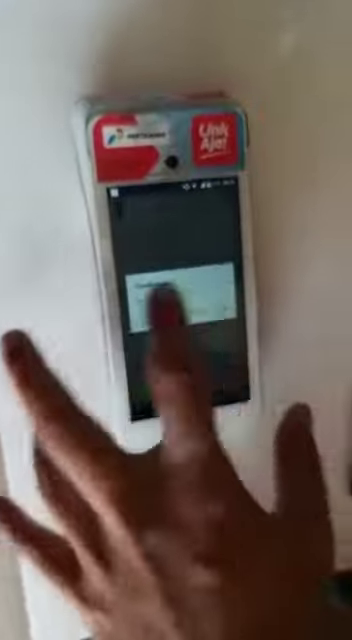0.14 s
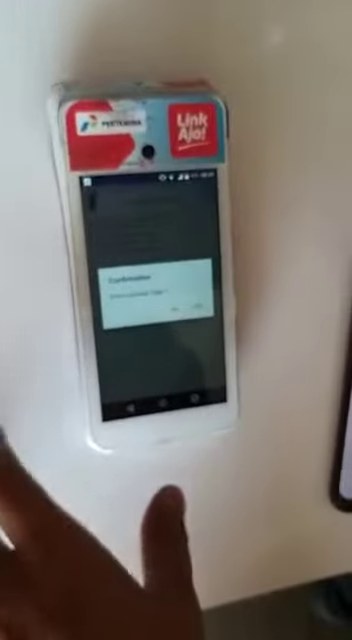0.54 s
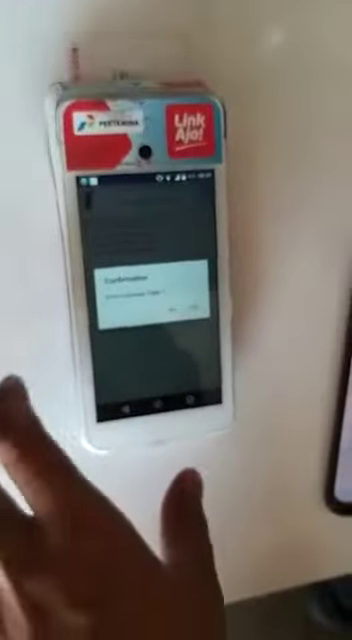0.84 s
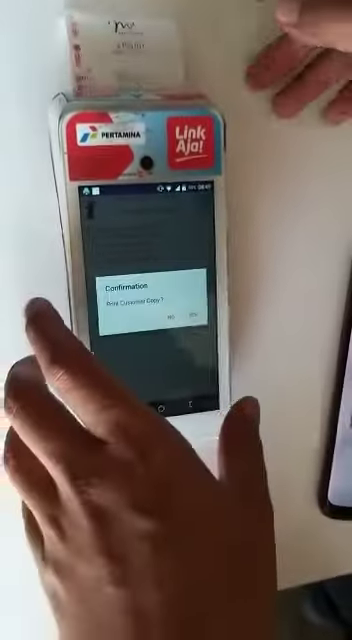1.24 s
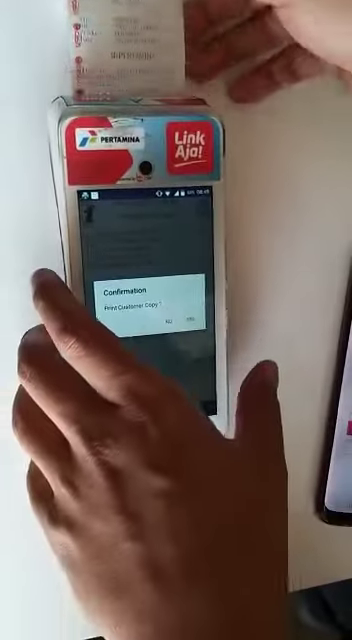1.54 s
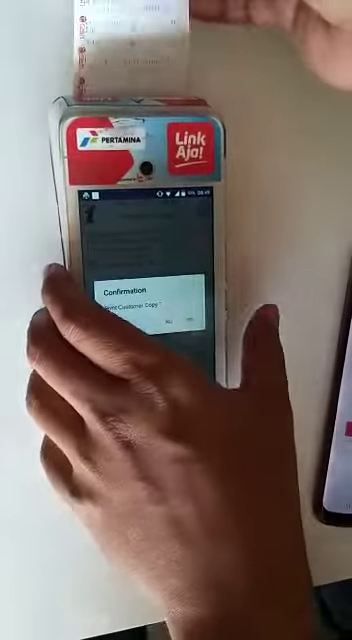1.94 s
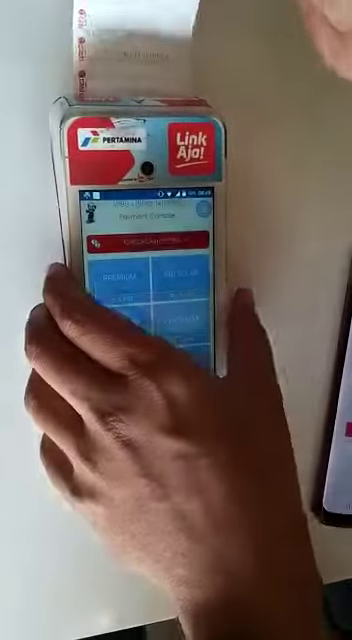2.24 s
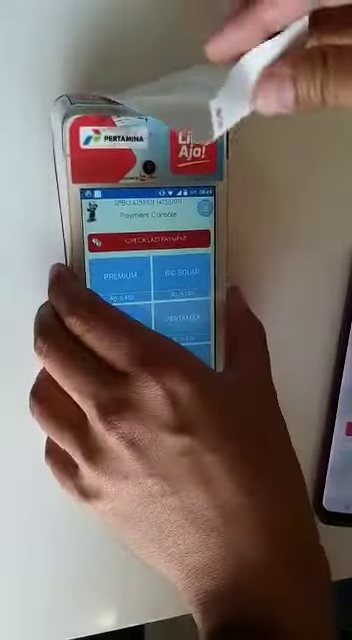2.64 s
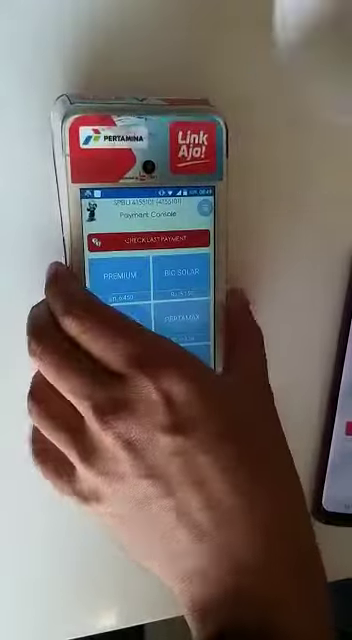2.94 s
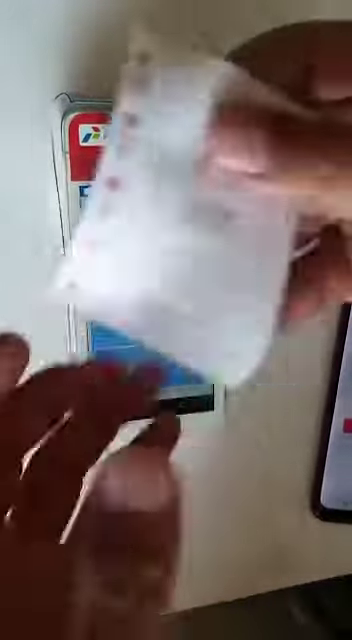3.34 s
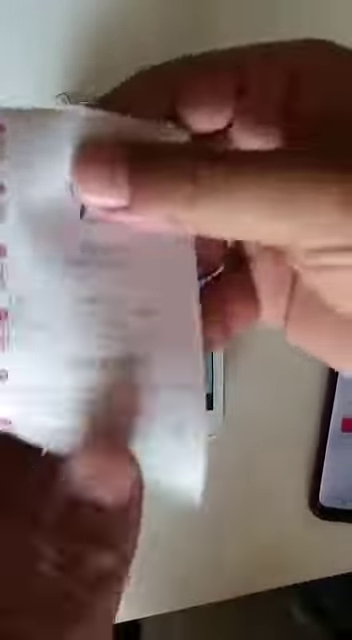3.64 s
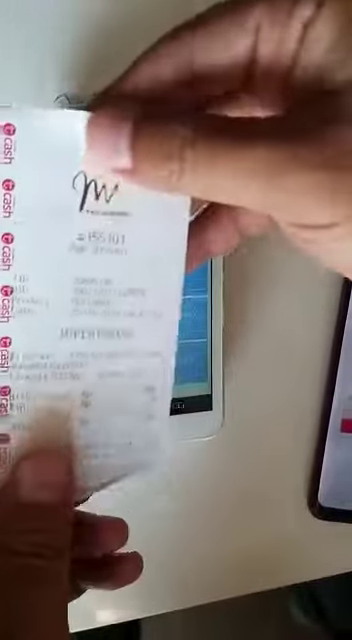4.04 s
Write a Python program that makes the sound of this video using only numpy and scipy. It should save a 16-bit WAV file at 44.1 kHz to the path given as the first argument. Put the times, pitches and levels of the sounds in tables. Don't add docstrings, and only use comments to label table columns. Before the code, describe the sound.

Grinding buzz of a handheld terminal printing, a pause with soft paper rustle, a sharp short tear, light crinkles and a final crisp flick.

```python
import sys
import numpy as np
from scipy import signal
from scipy.fft import rfft, irfft
from scipy.io import wavfile
from scipy.ndimage import map_coordinates

SR = 44100
rng = np.random.default_rng(int(sys.argv[2]) if len(sys.argv) > 2 else 0)


def makeup_ratio(level_db):
    decades = np.asarray(level_db, float) / 20
    return 10 ** decades


def unload_audio(sound):
    columns = np.transpose(np.atleast_2d(sound))
    steps = np.round(np.clip(columns, -1, 1) * 32767)
    wavfile.write(sys.argv[1], SR, steps.astype(np.int16))


N = 183897


def rms_one(x):
    return x / np.sqrt(np.mean(x ** 2) + 1e-20)


def in_time(rows):
    t = np.arange(N) / SR
    s, *columns = np.transpose(rows)
    gate = np.clip(np.minimum(t - s[0], s[-1] - t) / 0.0024, 0, 1)
    return [np.interp(t, s, c) for c in columns] + [gate]


def drift(rate):
    knots = rng.standard_normal(4000)
    return rms_one(map_coordinates(knots, [np.arange(N) * rate / SR], order=3))


def colour(x, spectrum):
    hz, db = np.transpose(spectrum)
    log_hz = np.log(np.linspace(1, SR / 2, 2049))
    cepstrum = irfft(np.log(makeup_ratio(np.interp(log_hz, np.log(hz), db))))
    cepstrum[1:2048] *= 2
    cepstrum[2049:] = 0
    impulse = irfft(np.exp(rfft(cepstrum)))
    return signal.oaconvolve(np.atleast_2d(x), impulse[None], axes=1)[:, :N]


def resonate(x, modes):
    out = 0
    for k, (hz, width, db) in enumerate(modes):
        r = np.exp(-np.pi * width / SR)
        a = [1, -2 * r * np.cos(2 * np.pi * hz / SR), r * r]
        out = out + (-1) ** k * makeup_ratio(db) * signal.lfilter([1 - r, 0, r - 1], a, x + 1e-18)
    return out


def band(x, low_hz, high_hz):
    return signal.sosfilt(signal.butter(2, [low_hz, high_hz], "band", fs=SR, output="sos"), x)


def grains(per_s, spread_db):
    sizes = makeup_ratio(spread_db * np.minimum(rng.exponential(1, N), 5)) * rng.choice([-1, 1], N)
    return rms_one(sizes * (rng.random(N) < per_s / SR))


def swell(start_s, rise_s, db, fall_db_per_s, rise_db):
    t = np.arange(N) / SR - start_s
    rise_s = max(rise_s, .002)
    below_db = rise_db * np.clip(1 - t / rise_s, 0, 1)
    sunk_db = fall_db_per_s * np.clip(t - rise_s, 0, 2)
    return (t > 0) * makeup_ratio(db - below_db - sunk_db)


def ports(x, lag_s, alike_hz):
    mid = x[0]
    side = signal.lfilter(*signal.butter(1, alike_hz, "high", fs=SR), x[1])
    right = map_coordinates(mid - side, [np.arange(N) - lag_s * SR], order=3)
    return np.array([mid + side, right])


# (frequency [Hz], level [dB])
TRAFFIC = [(18, -63.5), (30, -22), (38, -26.5), (66, -3.5), (103, -6), (170, -4), (374, -10.5), (404, -12),
           (449, -16.5), (702, -18), (988, -25.5), (1130, -28), (2230, -33.5), (2900, -36.5), (16000, -60)]
# (time [s], level [dB])
TRAFFIC_DB = [(0.0, -54), (0.65, -54), (0.91, -50.5), (1.33, -51), (1.56, -49), (2.17, -54), (2.45, -51),
              (2.65, -54.5), (2.79, -48), (2.97, -55), (3.4, -56.5), (4.17, -54)]


def traffic():
    level_db, gate = in_time(TRAFFIC_DB)
    noise = rms_one(colour(rng.standard_normal((2, N)), TRAFFIC))
    drone = rms_one(resonate(rng.standard_normal(N), [(84.6, 2.2, 0)]))
    lows = band(noise[0], 27, 130)
    noise[0] += (lows + 0.39 * drone) * makeup_ratio(1.0 * drift(4.4)) - lows
    wind = makeup_ratio(-73) * rms_one(band(rng.standard_normal((2, N)), 12, 90))
    hiss = makeup_ratio(-84.5) * rms_one(band(rng.standard_normal((2, N)), 11000, 17000))
    rumble = ports(noise, lag_s=0.000066, alike_hz=928)
    return makeup_ratio(level_db + 0.78 * drift(6.05)) * rumble + wind + hiss


# (frequency [Hz], level [dB])
SLIP = [(300, -9.5), (550, -3.5), (780, 1.5), (1080, -4), (1500, -1), (2350, 4.5), (3000, 0), (4500, -1.5),
        (8000, 0.5)]
# (time [s], peak level [dB], ring frequency [Hz], length [s])
TAPS = [(.2, -56, 6000, 0.015), (.605, -36.5, 2270, .017), (2.194, -48.5, 5020, 0.034),
        (2.316, -55, 5500, .015), (2.333, -46, 2100, .035), (2.399, -33.5, 530, 0.039),
        (2.4005, -23, 4460, 0.02), (2.4, -33, 1300, .03), (2.645, -21, 806, 0.05), (3.712, -38, 1010, .03),
        (3.713, -33.5, 1810, .04), (3.845, -37.5, 1400, .014), (4.137, -26, 1900, .03)]
CREASES = [(2.036, -59, 3950, .02), (2.953, -37, 6760, 0.018), (3.014, -41.5, 2920, .018),
           (3.162, -49.5, 3930, 0.045), (3.226, -45, 2500, 0.015), (3.291, -54, 6060, 0.018),
           (3.373, -50, 4700, .02), (3.598, -51, 3980, 0.046), (3.628, -46, 4900, 0.036),
           (3.633, -40, 5000, .02), (3.649, -42, 5000, 0.016), (3.668, -33, 4200, 0.013),
           (3.681, -36, 4530, 0.052), (3.702, -40, 4700, 0.044), (3.71, -31, 4600, 0.059),
           (4.048, -53, 5000, 0.078)]
CATCHES = [(2.556, -26.5, 3160, 0.0081), (2.579, -24.5, 3980, 0.011), (2.5847, -14.5, 6070, .007),
           (2.5909, -16.5, 3400, 0.016), (2.605, -35, 6030, .018), (2.6185, -13, 3340, 0.012),
           (2.623, -15, 2320, 0.03), (2.631, -20.5, 3000, 0.035), (2.642, -13, 3570, .02),
           (2.645, -7, 2300, .013), (2.648, -12.5, 4500, .008), (2.667, -14, 4550, 0.019),
           (2.6985, -12, 2400, 0.078), (2.730, -19, 2400, 0.042), (2.736, -16, 2600, .02),
           (2.683, -20, 4500, .03), (2.75, -18.5, 6500, 0.0066), (2.754, -15, 4510, 0.011)]
LAST_FIBRES = [
    (2.765, -14, 4030, .029),
    (2.7672, -2.5, 4400, .006),
]
FLICKS = [
    (4.1265, -40, 1800, .03),
    (4.13, -44, 5000, .03),
    (4.1428, -10, 6900, .022),
    (4.1436, -16, 4300, .025),
    (4.1445, -23, 1300, .025),
    (4.1435, -28, 450, .03),
]
# (rise [s], ring [dB], treble at 4 kHz ring [dB], treble tilt [dB per octave of ring])
CATCH, CREASE, TAP = (.0012, 4, -5, .1), (.0025, 2.5, -9.5, 3), (.0045, 4, -27, 4)
FLICK, LET_GO = (-0.14, 7.5, -24, -2), (.0026, 7, -11, .1)


def snaps():
    out, t = np.zeros((2, N + 4000)), np.arange(4000) / SR
    cracks = rng.standard_normal((60, 2, 4000)) * makeup_ratio(3.9 * rng.standard_normal((60, 1, 4000)))
    kinds = ((CATCHES, CATCH), (CREASES, CREASE), (TAPS, TAP), (FLICKS, FLICK), (LAST_FIBRES, LET_GO))
    rows = [row + kind for table, kind in kinds for row in table]
    for (s, db, hz, length, rise, ring_db, treble_db, tilt_db), crack in zip(rows, cracks):
        decay = makeup_ratio(-60 * np.maximum(t - rise, 0) / max(length, .003))
        burst = crack * decay * np.minimum(t / max(rise, .0002), 1)
        top_hz = np.clip(2.51 * hz, 420, 7800)
        broad = band(band(burst, max(280, 0.14 * hz), top_hz), 170, top_hz)
        broad = broad + resonate(burst, [(hz, hz * 0.14, ring_db)])
        treble = band(band(burst, 7000, 18000), 6500, 18000)
        treble_gain = makeup_ratio(treble_db + tilt_db * np.log2(hz / 4000))
        sound = broad / np.abs(broad[0]).max() + treble_gain * treble / np.abs(treble[0]).max()
        at = round(s * SR)
        out[:, at:at + 4000] += makeup_ratio(db) * sound * [[1], [.45]]
    return colour(out[:, :N], SLIP)


# (frequency [Hz], level [dB])
CASE = [(300, -16.5), (480, -16.5), (600, -3), (780, 2), (940, 5.5), (1000, -1), (1070, -12), (1250, -1.5),
        (1400, -6), (2000, -34.5)]
GEARS = [(1200, -16), (1700, -5.5), (1840, -3), (1950, -1), (2200, 4.5), (2320, 6.5), (2420, -8),
         (2650, -12), (2760, -10), (2850, -30), (3300, -11.5), (3700, -17), (5000, -28.5)]
FEED = [(3000, 7.5), (3800, -8), (4600, 2), (6400, -5.5), (7400, -4), (8000, -5), (10800, -14.5),
        (13000, -15.5), (16000, -14)]
# (multiple of step rate [1], level [dB])
HUM = [(4, -13), (5, -7), (6, 0), (8, -13)]
# (start [s], slowest [s], end [s], step rate [1/s])
DENSE_LINES = [(.56, .6, .69, 140), (.87, .9, .94, 149), (.955, .985, 1.1, 137), (.97, 1.1, 1.21, 122),
               (1.12, 1.18, 1.22, 137), (1.24, 1.33, 1.42, 127), (1.45, 1.5, 1.56, 144),
               (1.52, 1.56, 1.66, 127), (1.64, 1.68, 1.77, 120)]
# (time [s], frequency [Hz], level [dB])
SLIP_RING = [(.6, 2044, -52), (.66, 2236, -49), (.72, 2250, -62), (.95, 2153, -55.5), (1.2, 2260, -53.5),
             (1.4, 2400, -52), (1.62, 2480, -52), (1.8, 2780, -57), (1.985, 3150, -55)]
# (time [s], level [dB])
EFFORT = [(.6, -52), (.67, -54), (.692, -44), (.88, -49.5), (1.13, -46.5), (1.19, -42), (1.27, -48.5),
          (1.74, -45.5), (1.985, -45)]
PRINT_S = (.6, 1.985)
FREE_PER_S, FULL_LOAD_PER_S = 156, 30
UNEVEN_FREE, UNEVEN_LOADED = .4, .55
HUM_DB, WHINE_DB, HISS_DB = -6.5, -50.5, -54.5
HUM_LOAD_DB, WHINE_LOAD_DB, HISS_LOAD_DB = 7, 3, -3


def printer():
    t = np.arange(N) / SR
    gate = np.clip(np.minimum(t - PRINT_S[0], PRINT_S[1] - t) / .0026, 0, 1)
    slowed = np.max([(FREE_PER_S - per_s) * np.interp(t, times, [0, 1, 0])
                     for *times, per_s in DENSE_LINES], axis=0)
    per_s, load = FREE_PER_S - slowed, slowed / FULL_LOAD_PER_S
    uneven = UNEVEN_FREE + (UNEVEN_LOADED - UNEVEN_FREE) * load
    slip_hz, slip_db, _ = in_time(SLIP_RING)
    case_db, _ = in_time(EFFORT)

    turns = np.cumsum(per_s * (1 + .04 * uneven * drift(30)) / SR)
    hum = sum(makeup_ratio(db + 4.5 * drift(40)) * np.sin(2 * np.pi * k * turns) for k, db in HUM)
    ticks = np.diff(np.floor(turns + .08 * uneven * drift(120)), prepend=0)
    steps = rms_one(ticks * makeup_ratio(2.5 * drift(150)))
    knocks = steps * (1 - uneven) + grains(3000, spread_db=1.5) * uneven
    case = rms_one(colour(knocks, CASE)[0]) + makeup_ratio(HUM_DB + HUM_LOAD_DB * load) * hum

    teeth = np.array([grains(4000, spread_db=3) for side in range(2)])
    smooth_teeth = signal.lfilter([1], [1, -2 * .975, .975 ** 2], teeth[0])
    slip = rms_one(smooth_teeth * np.cos(2 * np.pi * np.cumsum(slip_hz) / SR))
    whine = rms_one(colour(teeth + 0.24 * steps, GEARS)) * [[.7], [.3]]
    shaft = rms_one(resonate(teeth[0], [(2320, 50, 0)]))
    whine[0] += makeup_ratio(-1.5 + 2.5 * drift(18)) * shaft

    feed = [grains(9000, spread_db=1.5) for side in range(2)]
    hiss = rms_one(colour(feed, [(1500, -26)] + FEED)) * [[.85], [.5]]
    hiss[0] += makeup_ratio(-12 + 5 * drift(9)) * rms_one(resonate(teeth[1], [(4750, 300, 0)]))
    hiss[0] += makeup_ratio(-15 + 5 * drift(8)) * rms_one(resonate(teeth[1], [(5450, 300, 0)]))
    hiss = hiss * makeup_ratio(HISS_DB + HISS_LOAD_DB * load + drift(30))

    body = makeup_ratio(case_db + 1.2 * drift(45)) * case
    body += makeup_ratio(slip_db + 2.2 * drift(20)) * slip
    return gate * (body * [[1], [0]] + makeup_ratio(WHINE_DB + WHINE_LOAD_DB * load) * whine + hiss)


# (start [s], end [s], peak level [dB], relative top [dB])
STROKES = [(1.986, 2.04, -61, -1), (2.05, 2.137, -65, -5.5), (2.167, 2.225, -68.5, -7),
           (2.353, 2.4, -76, -18), (2.41, 2.482, -64, -4), (2.478, 2.575, -64, -8), (2.9, 2.97, -59, -7),
           (2.967, 3.056, -61, -5.5), (3.06, 3.12, -65.5, -5), (3.15, 3.21, -68, -7),
           (3.212, 3.302, -63, -1), (3.316, 3.38, -69, -5), (3.37, 3.455, -69.5, -3),
           (3.512, 3.563, -75, -12), (3.597, 3.615, -67, -5), (3.663, 3.74, -63, -1),
           (3.727, 3.815, -62, -2), (3.883, 3.99, -65, -7), (4.004, 4.089, -72.5, -9),
           (4.12, 4.17, -74, -4)]
STROKE_RISE_S, STROKE_RISE_DB, STROKE_SAG_DB_PER_S, LIFT_DB_PER_S = 0.025, 10, 30.5, 300


def rustle():
    t = np.arange(N) / SR
    grit = np.array([grains(9000 * makeup_ratio(2.5 * drift(40)), spread_db=2.5) for side in range(2)])
    body = rms_one(band(grit, 1800, 7500) + .45 * resonate(grit, [(5000, 700, 8)]))
    top = rms_one(band(band(grit, 8000, 17000), 7500, 17000))
    gains = []
    for start_s, end_s, db, top_db in STROKES:
        lift = makeup_ratio(-LIFT_DB_PER_S * np.clip(t - end_s, 0, 1))
        gains.append(lift * swell(start_s, STROKE_RISE_S, db, STROKE_SAG_DB_PER_S, STROKE_RISE_DB))
    gains = np.array(gains)
    tops = gains * makeup_ratio(np.array(STROKES)[:, 3:])
    return np.max(gains, axis=0) * body + np.max(tops, axis=0) * top


# (frequency [Hz], level [dB])
TORN = [(300, -12.5), (550, -7), (790, -2), (1080, -16.5), (1500, -8), (2400, -1.5), (3500, -8.5),
        (5000, -3), (6700, -5.5), (8500, -12.5), (10500, -16), (12500, -8), (16000, -14.5)]
# (time [s], level [dB])
PULL = [(2.575, -50), (2.62, -42), (2.64, -39.5), (2.652, -23.5), (2.72, -25), (2.745, -25), (2.762, -43),
        (2.785, -40), (2.86, -59)]


def rip():
    fibres_db, gate = in_time(PULL)
    clumps = makeup_ratio(6 * drift(140))
    breaks = [grains(3000 * clumps, spread_db=4.5) for side in range(2)]
    fibres = rms_one(colour(breaks, TORN))
    bright = band(fibres, 7000, 17000)
    fibres = fibres + bright * (makeup_ratio(6.2 * drift(90) - 3.5) - 1)
    return gate * makeup_ratio(fibres_db) * fibres * [[1], [.6]]


# (start [s], rise [s], peak level [dB], fall [dB/s])
THUMPS = [
    (2.59, 0.077, -41, 61.5),
    (2.70, 0.093, -43, 199.5),
    (4.139, 0.0073, -47, 400),
]


def thumps():
    thump = rms_one(band(rng.standard_normal(N), 75, 195))
    return thump * sum(swell(*row, rise_db=11) for row in THUMPS)


def echoes(x, t60, start_s):
    t = np.arange(SR // 2) / SR
    mid, side = rng.standard_normal((2, len(t))) * makeup_ratio(-60 * t / t60) * (t > start_s)
    side = signal.lfilter(*signal.butter(2, 900, "high", fs=SR), side)
    roof = [(300, 6.5), (800, 3.5), (1600, 2.5), (2400, -2.5), (3500, 1.5), (7000, -3.5), (16000, -3.5)]
    tails = colour([mid + side, mid - side], roof)
    return signal.fftconvolve(x, tails / np.sqrt(np.sum(tails ** 2) / 2), axes=1)[:, :N]


def scene():
    near = ports(snaps(), lag_s=0.000207, alike_hz=1180)
    near = near + ports(printer(), lag_s=0.00031, alike_hz=600)
    near = near + ports(rustle(), lag_s=.0001, alike_hz=900)
    near = near + ports(rip(), lag_s=0.00028, alike_hz=1400)
    canopy = makeup_ratio(-12.5) * echoes(near, t60=0.44, start_s=0.0044)
    return near + canopy + thumps() + traffic()


def top_cut(x):
    return signal.sosfilt(signal.butter(12, 16960, fs=SR, output="sos"), x)


def record(dry):
    right = colour(dry[1], [(700, 0.5), (1500, 1.5), (3000, -1), (12000, -2.5)])[0]
    both = np.array([dry[0], right])
    wet = colour(both, [(25, -5.0), (50, 0), (10000, 1.5), (10700, 2), (11300, 3.5)])
    wet = 0.98 * np.tanh(wet / 0.92)
    wet = signal.sosfilt(signal.cheby2(12, 50, 16400, fs=SR, output="sos"), wet)
    return top_cut(wet)


dry = scene()
out = record(dry)
unload_audio(out)
```